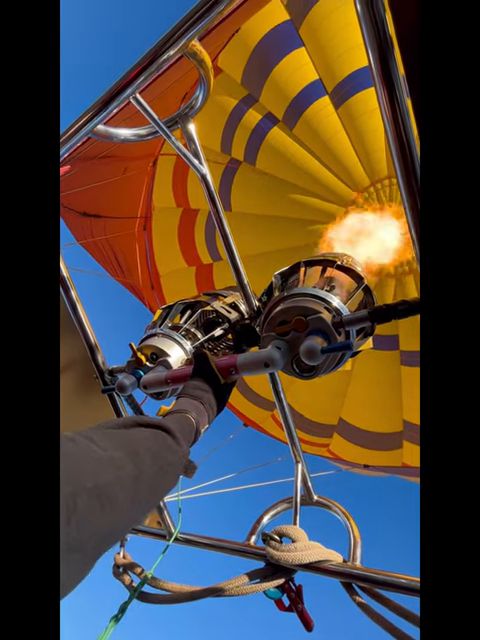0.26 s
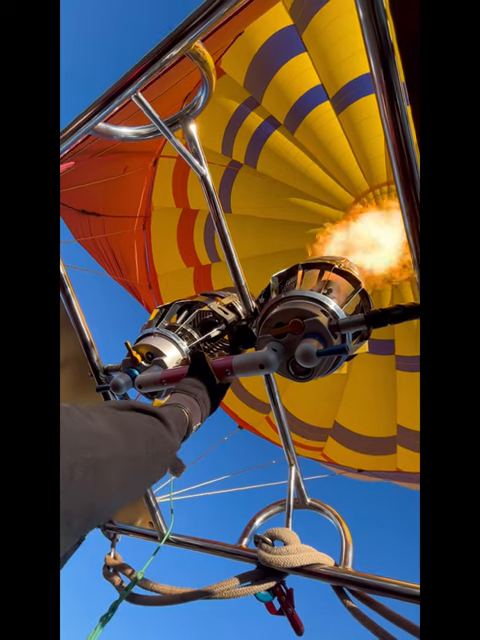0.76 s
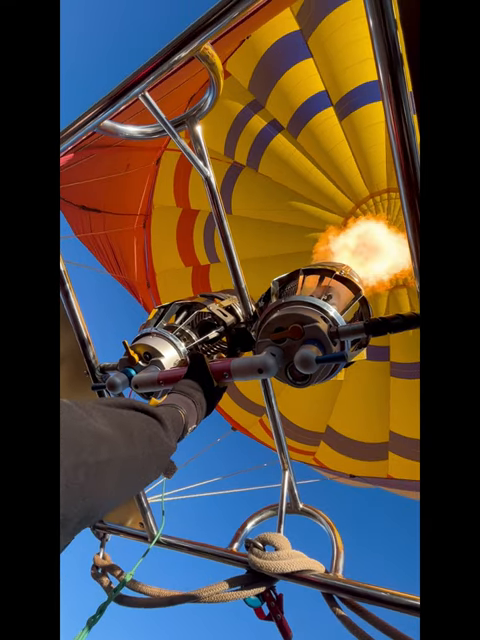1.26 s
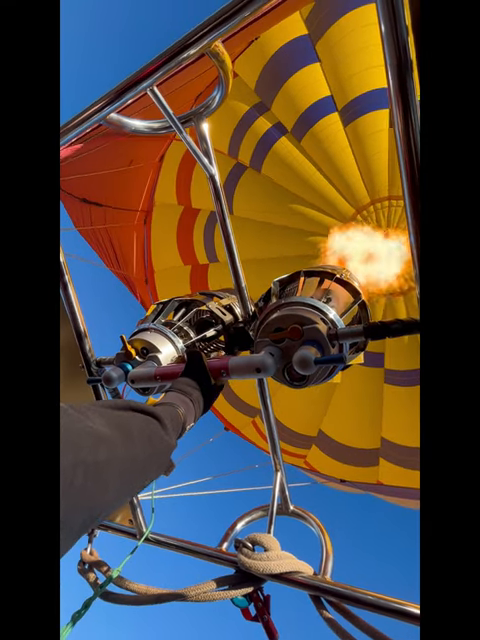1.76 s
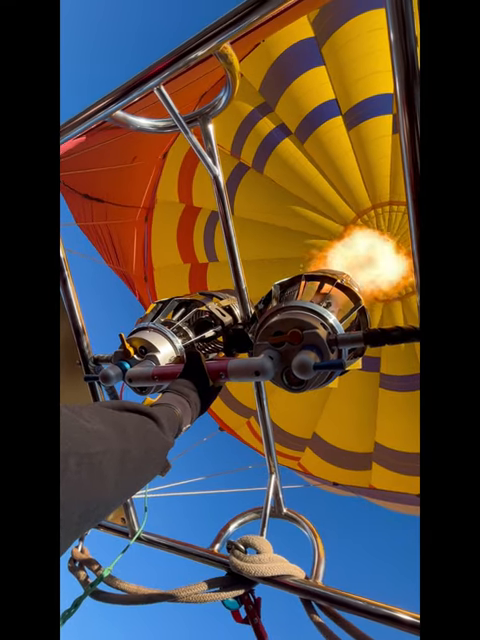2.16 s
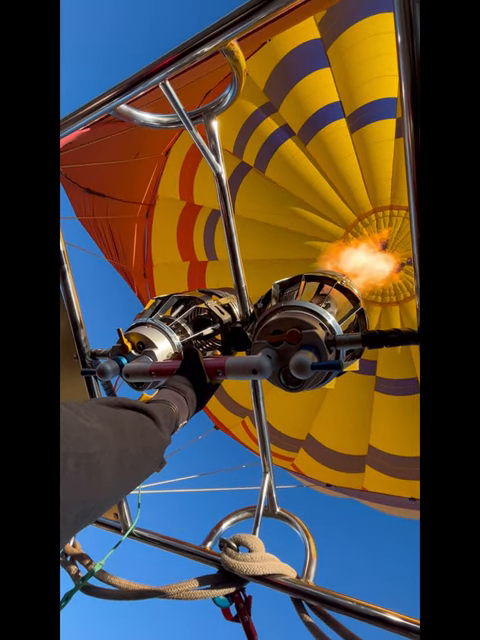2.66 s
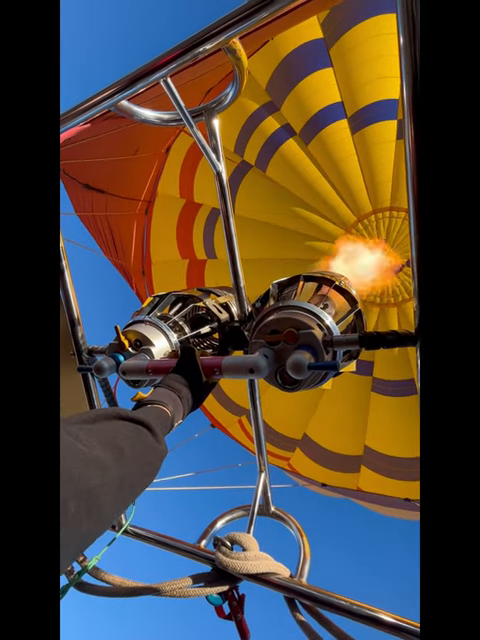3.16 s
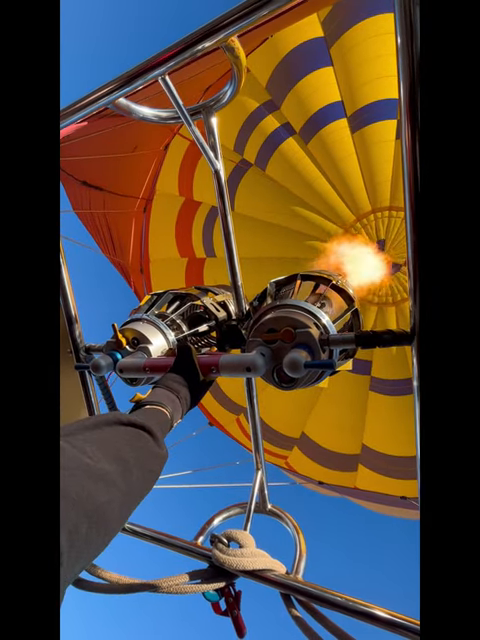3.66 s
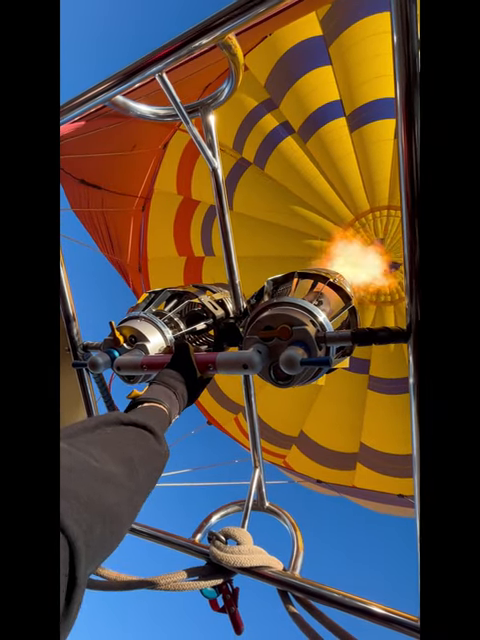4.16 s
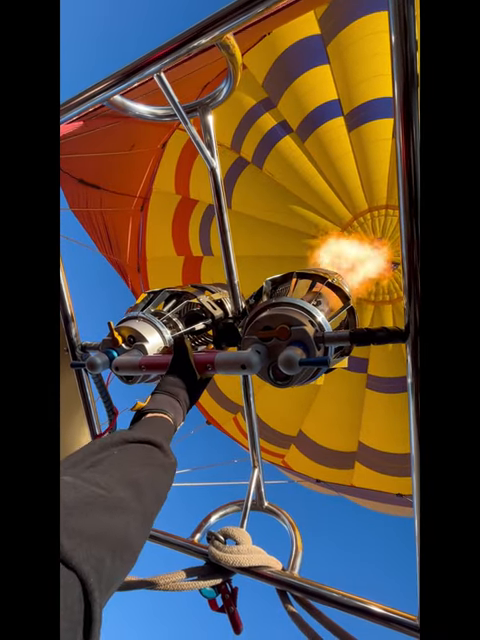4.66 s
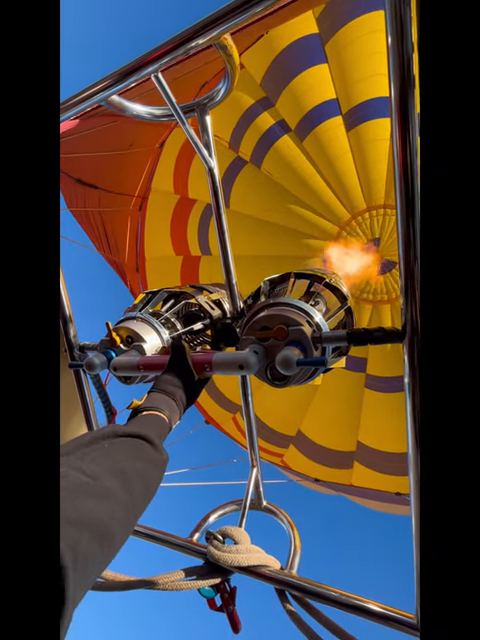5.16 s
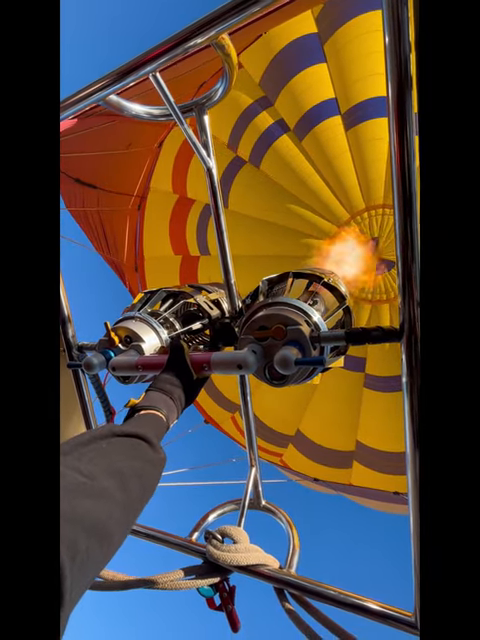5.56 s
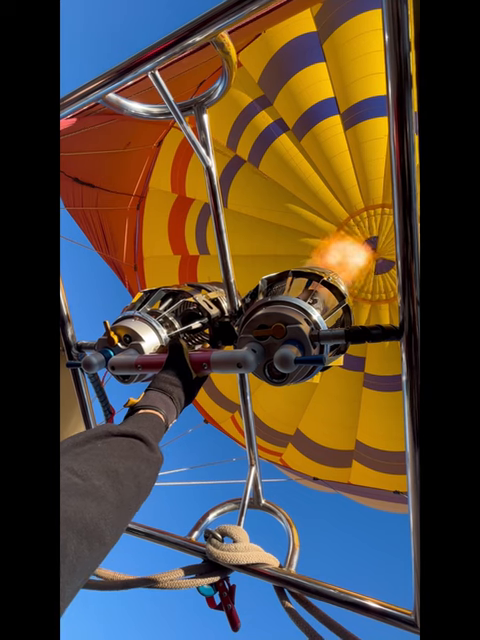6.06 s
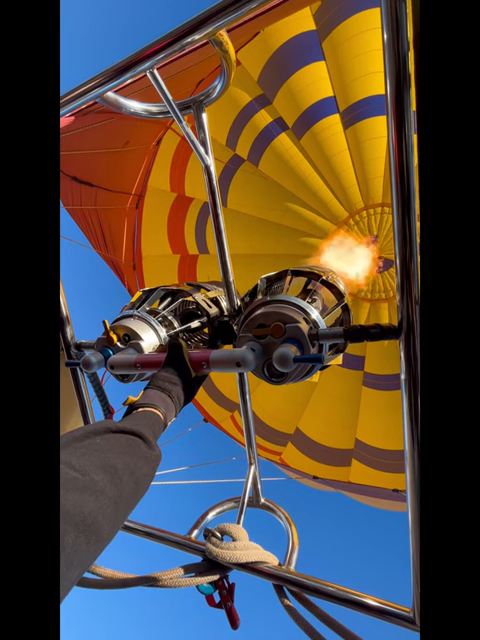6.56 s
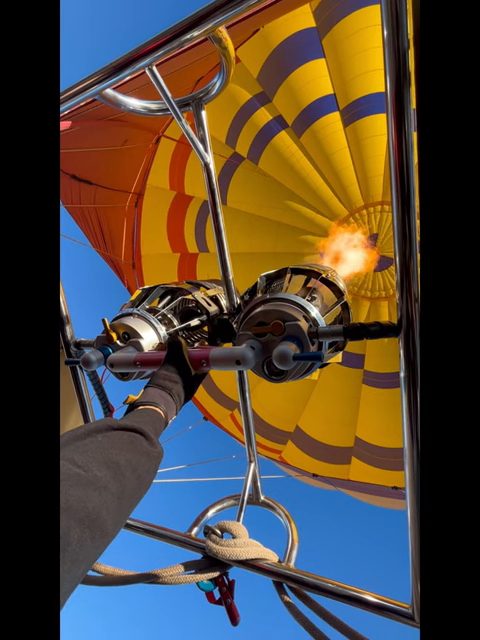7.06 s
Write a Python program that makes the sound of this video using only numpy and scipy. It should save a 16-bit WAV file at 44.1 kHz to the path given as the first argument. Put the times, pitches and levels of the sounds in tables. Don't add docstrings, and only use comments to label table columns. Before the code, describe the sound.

From 0 seconds a propane burner is already at full blast overhead in an open balloon basket, and it never stops through about 7.3 seconds. Its body is a dense, deep, turbulent roar, strongest in the bass around 100 hertz, with rough midrange and fine rapid fluttering. Above it sits a smooth, bright jet hiss, wide and airy. At first the level is steady, the hiss firming slightly. Near 2.25 the low flame swells noticeably while the hiss sags, then gradually recovers. Around 3.2 to 3.4 the microphone turns in the hand, subtly shifting the midrange colour. The roar swells again near 4.9, eases slightly about 6.15, grows at 6.5 with a small hiss dip, and eases a little at 7.05. Close hand-held stereo, short basket reflections, outdoors, ending while still burning.

```python
import sys
import numpy as np
from scipy import signal
from scipy.fft import rfft, irfft, next_fast_len
from scipy.io import wavfile

SR = 44100
rng = np.random.default_rng(int(sys.argv[2]) if len(sys.argv) > 2 else 0)


def volts_from_decibels(level):
    exponent = np.asarray(level, float) / 20
    return 10 ** exponent


def store_wav(level_fs):
    pcm = np.round(np.clip(np.atleast_2d(level_fs), -1, 1) * 32767)
    wavfile.write(sys.argv[1], SR, pcm.T.astype(np.int16))


N = 322793
SIZE = next_fast_len(N + 4096)
HZ = np.maximum(np.arange(SIZE // 2 + 1) * SR / SIZE, 1)


def at_hz(points):
    hz, value = np.transpose(points)
    return np.interp(np.log(HZ), np.log(hz), value)


def drift(rate):
    coarse = 40
    settle = 2000
    pole = np.exp(-2 * np.pi * rate * coarse / SR)
    noise = rng.standard_normal(N // coarse + settle + 2)
    slow = signal.lfilter([1], [1, -2 * pole, pole * pole], noise)[settle:]
    return np.interp(np.arange(N) / coarse, np.arange(len(slow)), slow / slow.std())


def to_time(spectra):
    return irfft(spectra, SIZE)[:, :N]


def at_ports(scatter_db, lag, paths):
    common, left, right = rfft(rng.standard_normal((3, SIZE)))
    scatter = volts_from_decibels(np.minimum(scatter_db, 0))
    shift = np.exp(0.5j * lag)
    coherent = np.sqrt(1 - scatter ** 2) * common
    direct = coherent * np.array([1 / shift, shift]) * paths
    return direct + scatter * np.array([left, right])


def basket(echoes):
    response = 1
    for ms, share, dull_hz in echoes:
        delay = np.exp(-2j * np.pi * HZ * ms / 1000)
        response = response + share * delay / (1 + 1j * HZ / dull_hz) ** 2
    return response


def flicker(spectra, centres_hz, shared_db, own_db, rate):
    together = drift(rate)
    bands = []
    for top in np.eye(len(centres_hz)):
        band = to_time(spectra * at_hz(list(zip(centres_hz, top))))
        bands.append(band * volts_from_decibels(shared_db * together + own_db * drift(rate)))
    return bands


# (time [s], lasting flame step [dB], passing nozzle pressure sag [dB])
FUEL_SURGES = [
    (-.2, 0, 1.5),
    (2.25, 1.93, 3),
    (4.9, 1.65, 0.1),
    (6.15, -.8, -.3),
    (6.5, 1.5, 0.9),
    (7.05, -0.78, 0.4),
]


def fuel_feed():
    rise_s, recovery_s = 0.12, 1.9
    s, step_db, sag_db = np.transpose(FUEL_SURGES)
    since = np.arange(N)[:, None] / SR - s
    rise = (1 + np.tanh(since / rise_s)) / 2
    recovery = np.exp(-np.maximum(since, 0) / recovery_s)
    return rise @ step_db, -(rise * recovery) @ sag_db


# (frequency [Hz], density [dB per Hz])
FLAME_LEFT = [(25, -34.9), (45, -10.7), (100, 4.5), (250, -8.0), (450, -9.3), (800, -12.0), (1150, -10.3),
              (1500, -18.9), (2000, -16.6), (2500, -20.7), (3000, -18.7), (3500, -27.7), (3900, -24.4),
              (4500, -27.1)]
FLAME_RIGHT = [(25, -36.9), (45, -14.1), (100, 2.9), (250, -7.4), (450, -11.3), (800, -9.4), (1150, -18.6),
               (1500, -22.2), (2000, -20.0), (2500, -19.5), (3000, -20.6), (3500, -24.0), (3900, -22.8),
               (4500, -20.4)]
# (frequency [Hz], lag of the left port [rad])
FLAME_LAG = [(60, 0.16), (150, 0.56), (300, 0.62), (550, 1.8), (850, 2.06), (1050, 3.48), (1250, 4.97),
             (1900, 5.37), (2150, 4.97), (2500, 3.13), (2900, 1.61), (3250, 2.73), (3700, 3.97),
             (4150, 5.56)]
# (frequency [Hz], share [dB])
FLAME_SCATTER = [(70, -36), (150, -27), (400, -20), (1000, -19), (1500, -11), (1900, -10.5), (2250, -6),
                 (2900, -7.5), (3350, -1.5), (3900, -5)]
# (delay [ms], share [ratio], dull above [Hz])
BASKET_LEFT = [(1.9, -0.23, 260.0), (3.32, 0.77, 500.0), (4.31, -0.13, 1400.0), (8.83, 0.08, 1420.0),
               (11.06, -0.16, 460.0)]
BASKET_RIGHT = [(1.5, 0.39, 480.0), (2.31, -0.13, 1670.0), (3.3, 0.62, 300.0), (8.89, -0.05, 1010.0),
                (11.28, -0.29, 200.0)]


def roar(low_db, upper_db):
    split_hz = 900
    past_table = np.exp(-np.maximum(HZ / FLAME_LEFT[-1][0] - 0.9, 0) * 6.96)
    lag = at_hz(FLAME_LAG) * np.minimum(HZ / FLAME_LAG[0][0], 1)
    paths = np.array([basket(BASKET_LEFT), basket(BASKET_RIGHT)])
    colour = volts_from_decibels(np.array([at_hz(FLAME_LEFT), at_hz(FLAME_RIGHT)])) * past_table
    spectra = at_ports(at_hz(FLAME_SCATTER), lag, paths) * colour
    centres_hz = np.geomspace(40, 4000, 9)
    bands = flicker(spectra, centres_hz, shared_db=0.25, own_db=0.35, rate=20.0)
    low = sum(band for band, hz in zip(bands, centres_hz) if hz < split_hz)
    upper = sum(bands) - low
    return volts_from_decibels(low_db + 21.0) * low + volts_from_decibels(upper_db + 28.0) * upper


# (time [s], progress [0-1])
COLOUR_PROGRESS = [(0, 0), (3.15, .1), (3.4, .95), (7.32, 1)]
# (frequency [Hz], change [dB])
COLOUR_CHANGE = [(250, 0), (450, 1.5), (830, 0), (945, -7), (1030, 1), (1300, -2), (1600, -1), (2300, 2),
                 (3000, 0)]


def recoloured(flame):
    s, progress = np.transpose(COLOUR_PROGRESS)
    progress = np.interp(np.arange(N) / SR, s, progress)
    spectra = rfft(flame, SIZE)
    before = to_time(spectra * volts_from_decibels(-0.5 * at_hz(COLOUR_CHANGE)))
    after = to_time(spectra * volts_from_decibels(0.5 * at_hz(COLOUR_CHANGE)))
    return (1 - progress) * before + progress * after


# (frequency [Hz], density [dB per Hz])
JET_COLOUR = [(2800, -28), (3900, -9), (4500, 0), (5400, -1.7), (6300, -1.7), (7300, -.1), (8200, -2.2),
              (9200, -1.3), (10600, -2.8), (12200, -4.4), (13500, -1.3), (14600, -2), (15600, 1.1)]
# (frequency [Hz], left minus right [dB])
JET_BALANCE = [(3800, -2), (4400, -6), (5300, 0), (16000, 0)]
# (frequency [Hz], lag of the left port [rad])
JET_LAG = [(4300, 3.3), (5350, 3.2), (6050, 2.7), (7930, 0), (9980, -3.14), (12680, -6.28), (14950, -9.42),
           (15730, -10.2)]
# (frequency [Hz], share [dB])
JET_SCATTER = [(4500, -10), (5700, -11.3), (7000, -17), (10000, -24), (12500, -18), (15000, -25)]


def jets(hiss_db):
    half_balance = at_hz(JET_BALANCE) / 2
    colour = volts_from_decibels(at_hz(JET_COLOUR) + np.array([half_balance, -half_balance]))
    spectra = at_ports(at_hz(JET_SCATTER), at_hz(JET_LAG), 0.9) * colour
    centres_hz = np.geomspace(3500, 15000, 7)
    return volts_from_decibels(hiss_db + 6) * sum(flicker(spectra, centres_hz, shared_db=0.55, own_db=0.58, rate=45.0))


def scene():
    low_roar_db, upper_roar_db, jets_db = -24.5, -29.7, -30.5
    flame_db, pressure_db = fuel_feed()
    upper_db = upper_roar_db + 0.38 * flame_db + 0.4 * pressure_db
    flame = recoloured(roar(low_roar_db + flame_db, upper_db))
    return flame + jets(jets_db + pressure_db)


def roll_off(x):
    return signal.sosfilt(signal.butter(12, 15940, fs=SR, output="sos"), x)


def record(dry):
    wind_cut = signal.butter(2, 16, "high", fs=SR, output="sos")
    cut = signal.sosfilt(wind_cut, dry)
    top_hz = 15725
    cut = to_time(rfft(cut, SIZE) * (HZ < top_hz))
    return roll_off(cut)


dry = scene()
out = record(dry)
store_wav(out)
```